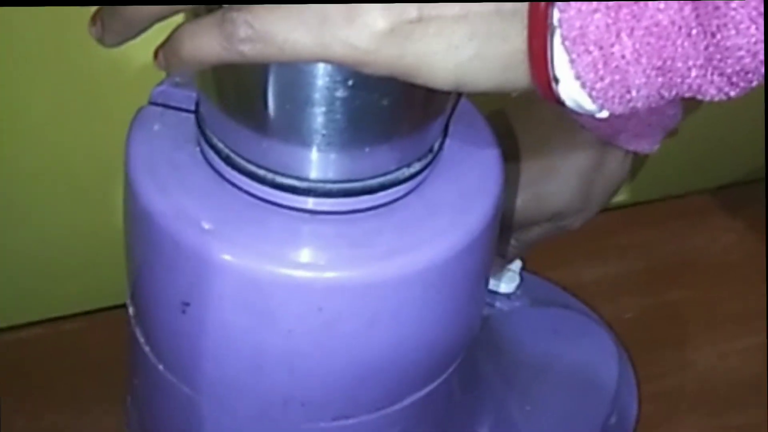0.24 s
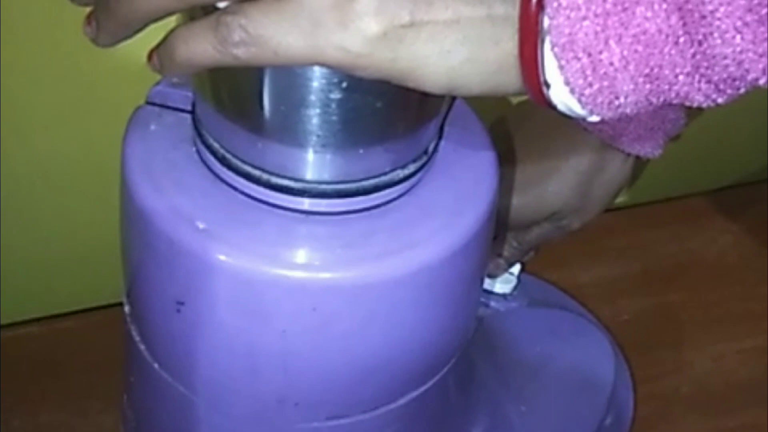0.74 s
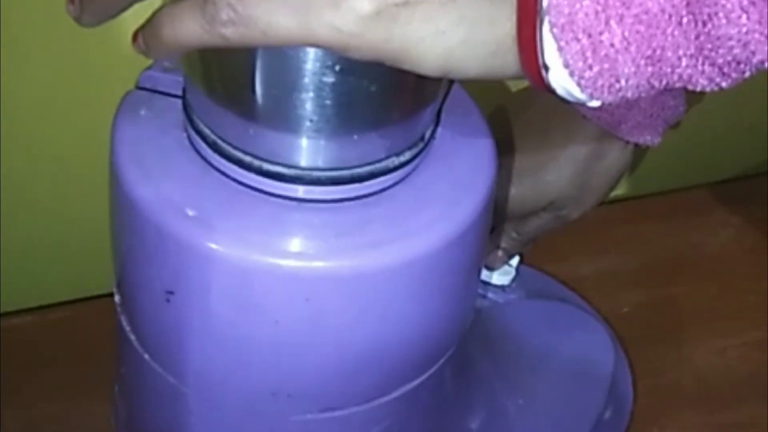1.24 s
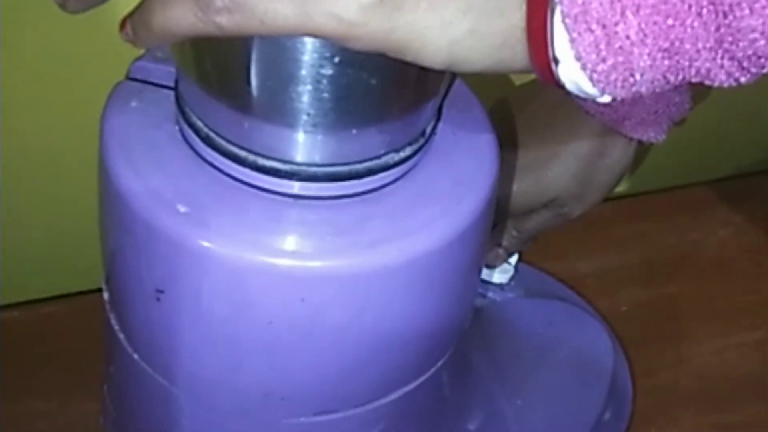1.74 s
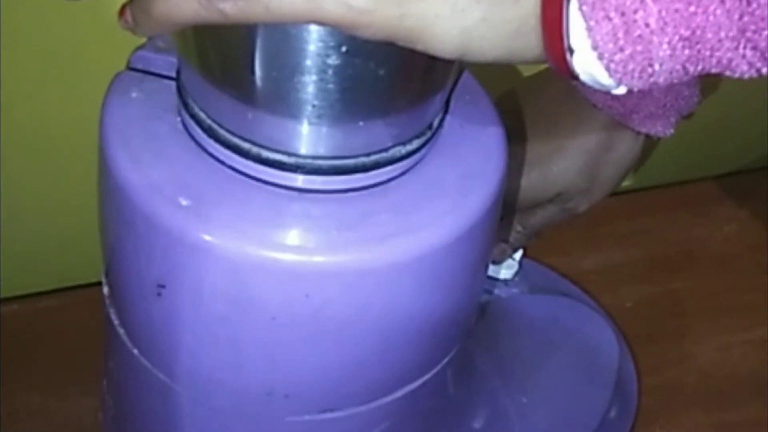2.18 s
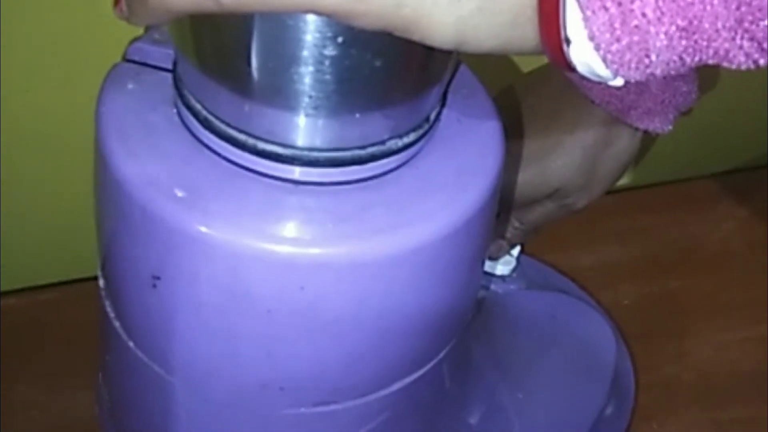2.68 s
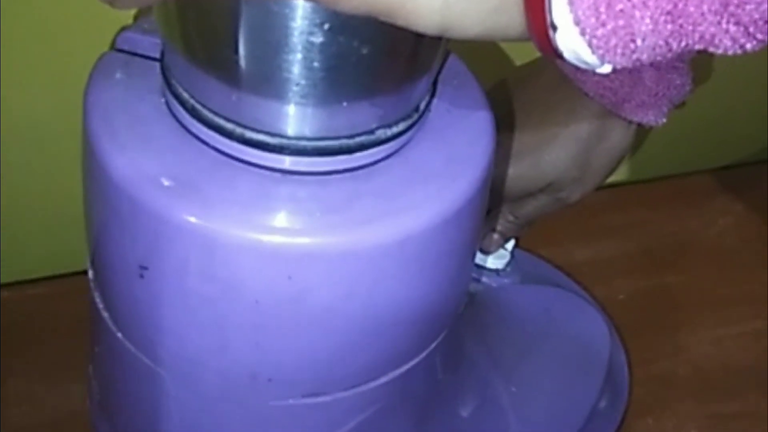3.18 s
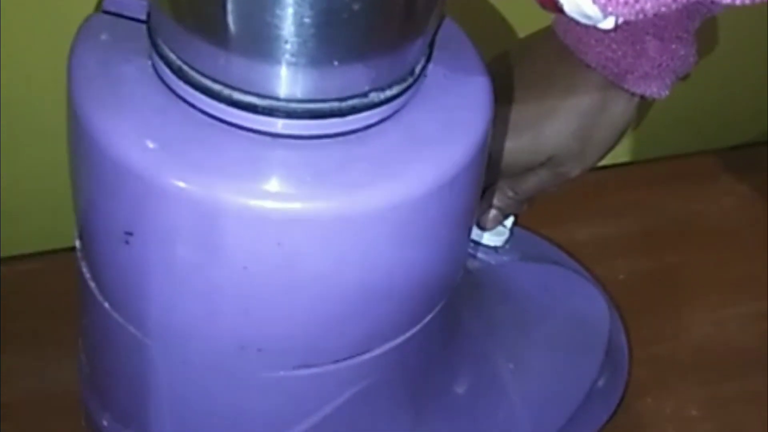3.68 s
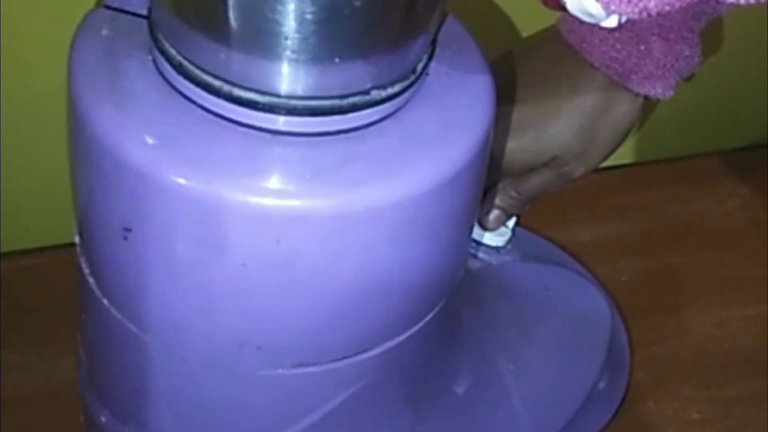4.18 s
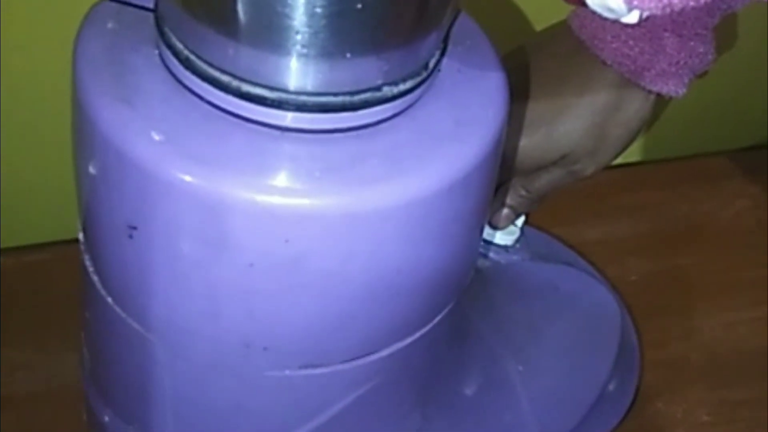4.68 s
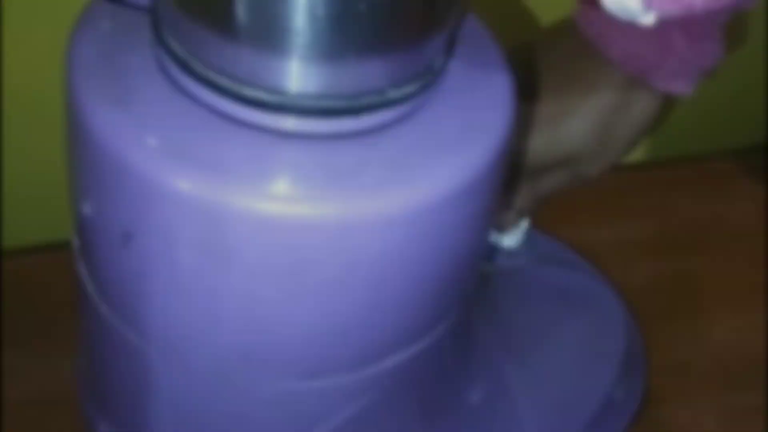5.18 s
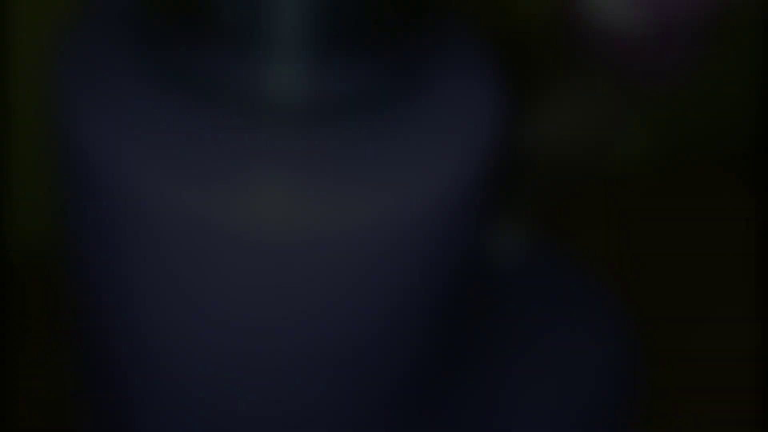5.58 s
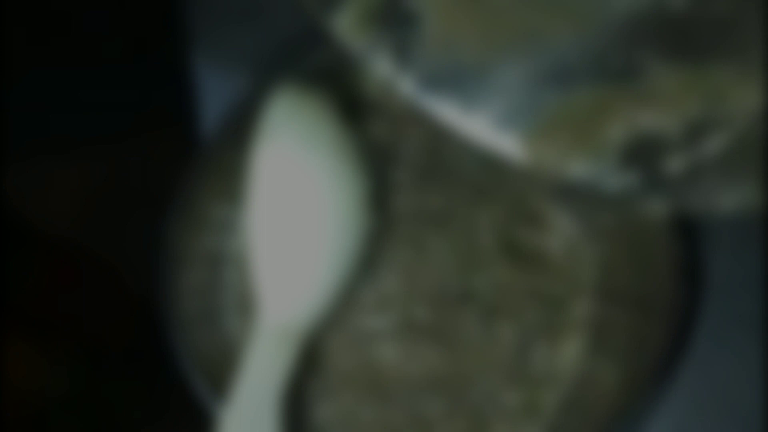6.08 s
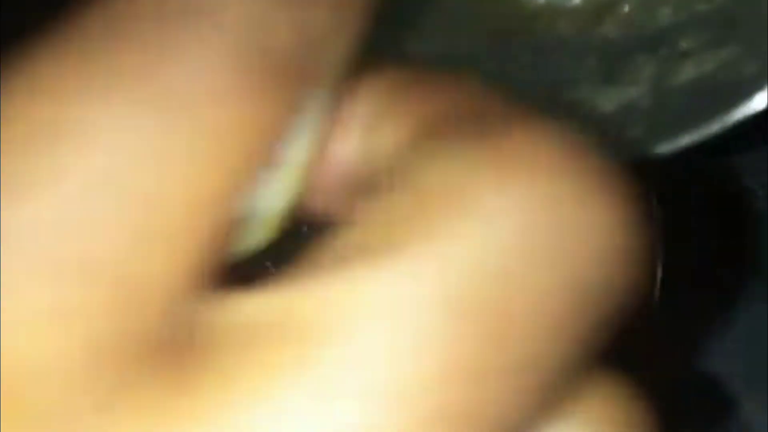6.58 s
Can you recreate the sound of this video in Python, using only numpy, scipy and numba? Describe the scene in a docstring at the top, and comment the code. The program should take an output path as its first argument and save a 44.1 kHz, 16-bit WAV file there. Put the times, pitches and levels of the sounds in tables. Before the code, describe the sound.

An electric mixer grinder clicks on, whirs loudly through paste, then cuts off abruptly; a spoon faintly scrapes and taps a steel jar.

```python
"""In a kitchen, a mixer grinder clicks on, spins up and whirs. Shaft unbalance, blades and commutator
sound harmonics of the rotation over mains hum; churning paste excites the resonances of the steel jar,
and turbulent cooling air hisses. The whir is cut off abruptly. The quiet room, heard briefly at the
start, fades in again with a far engine throbbing, and a spoon scrapes and taps a steel jar,
setting its modes ringing."""
import sys
import numpy as np
from scipy import signal
from scipy.fft import rfft, irfft, next_fast_len
from scipy.io import wavfile
from scipy.ndimage import uniform_filter1d
from numba import njit

SR = 44100
rng = np.random.default_rng(int(sys.argv[2]) if len(sys.argv) > 2 else 0)


def output_pcm(signal):
    """Save a mono or channel-first signal as 16-bit PCM at the path in sys.argv[1].

    Samples are clipped to [-1, 1] before scaling.
    """
    pcm = np.clip(np.atleast_2d(signal).T, -1, 1) * 32767
    wavfile.write(sys.argv[1], SR, np.round(pcm).astype(np.int16))


N = 301203
T = np.arange(N) / SR
PAN = np.array([[.5], [-.5]])  # splits a pan, the left minus right level, between the channels

# Stereo field: (frequency [Hz], pan [dB]), (frequency [Hz], coherence [0-1]), (frequency [Hz], lag [rad])
BALANCE = [(60, 1), (200, -2.5), (700, 2.5), (1300, 1), (2400, 3.5), (4400, -1), (6000, 0), (8200, 11),
           (10500, 10), (12500, 4.5), (13500, 10.5), (15400, -6.5)]
COHERENCE = [(30, .3), (60, .9), (100, .94), (200, .97), (400, .91), (700, .87), (1400, .62), (2800, .52),
             (5000, .2), (15000, .02)]
LEFT_LAG = [(100, 0.11), (300, 0.21), (700, 0.52), (1400, 1.84), (2800, 7.57), (5000, 10.1)]
# Noise spectra: (frequency [Hz], relative spectral density [dB])
ROOM_SPECTRUM = [(30, -12), (60, 7), (100, 4.5), (180, -2), (290, -13), (450, -9.5), (1000, -9.5),
                 (2200, -13), (3800, -20.5), (7000, -32), (11000, -31), (15400, -22.5)]
SWITCH_SPECTRUM = [(300, -18), (1200, -11), (2000, -5), (3100, 2), (4500, -12), (7000, -30), (12500, -13.5),
                   (15400, -38)]
CHURN_SPECTRUM = [(24, -79.5), (40, -49), (87, -23.5), (182, -15), (240, -9), (286, -10.5), (395, -14.5),
                  (708, -12.5), (1050, -14), (1610, -14), (2760, -15), (3430, -20.5), (3910, -23),
                  (6150, -33.5), (7000, -41), (9100, -95.5), (15400, -120)]
AIR_SPECTRUM = [(3200, -30), (5500, -11), (6700, -13.5), (8000, -10), (9600, -6), (10600, -1),
                (11100, -1.5), (11600, 1.5), (12100, -2), (12800, -3), (14500, -1), (15500, 1)]
SCRAPE_SPECTRUM = [(400, -20), (1000, -9), (2300, 4), (3500, 4), (5000, -16), (7500, -15), (12000, -9),
                   (15400, -7)]
# Quiet stretches: (start [s], fade-in [s], room level [dB], engine level [dB])
QUIET_STRETCHES = [(.09, 0.09, -59.5, -59), (5.79, 0.18, -62.5, -61)]
# One crest of the engine's throb in each stretch: (time [s])
THROB_CRESTS = [0.14, 6.481]
# Cracks of the switch knob: (time [s], level [dB], decay time [s])
SWITCH_CRACKS = [(.358, -27, 0.012), (.365, -12.5, 0.0047), (0.37, -25, 0.0045)]
# Shaft speed under the changing load: (time [s], rotation rate [Hz])
LOADED_SPEED = [(1.2, 243), (1.45, 241.3), (1.93, 242), (2.05, 240.2), (3.03, 240.6), (3.16, 238.6),
                (3.3, 238.2), (3.8, 240.4), (4.98, 240), (5.2, 241.6), (5.48, 242.8), (5.74, 242.6)]
# Brief dips of the unbalance tone: (time [s], depth [dB], half width [s])
UNBALANCE_DIPS = [(.49, -1, .04), (0.535, 0, 0.018), (.665, 11, 0.039), (.745, 15, 0.014), (1.18, 5, .015),
                  (1.64, 8, 0.046), (1.89, 3, 0.062), (4.05, 1, .015), (5.15, 3, 0.05), (5.38, 4, 0.043),
                  (5.48, 4, 0.021)]
# Partials, multiples rounded in use: (shaft multiple, ripple multiple, relative level [dB], pan [dB])
BEAT_PARTIALS = [(0.98, -0.84, -25, -1.2)]  # hum beating with the unbalance tone
BLADE_PARTIALS = [(2, 0, -2.5, 1.5), (2, 1, -4.5, -3), (3, 1, -6.5, -2.5), (6, 0, -5, 8.5), (8, 0, -9.5, 6),
                  (10, 0, -6, -2.5)]
SINGING_PARTIALS = [(3, 0, -35, -1), (4, 0, -43, -2)]  # blade tones that grow as the paste turns smooth
WHINE_PARTIALS = [(16, 0, -13, -7), (36, 0, -27, 11), (48, 0, -25, 16), (64, 0, -22, 0)]
SLOT_PARTIALS = [(12, 0, -27, 0), (24, 0, -34, 0)]
HUM_PARTIALS = [(0, 1.1, -41, -1.1), (0, 2.2, -37.5, -1)]
# Transmission through the motor shell: (frequency [Hz], gain [dB])
SHELL_RESPONSE = [(1000, -5), (1800, -10), (2150, 6), (2600, 5), (3300, 2), (3900, 8), (4300, -5),
                  (4750, -3), (5050, 5), (5300, 0), (5600, -10)]
# Jar and housing resonances and dips:
# (frequency [Hz], width [Hz], left gain [dB], right gain [dB], change with smooth paste [dB])
BODY_MODES = [(308.7, 50, 1.5, 5.5, -6), (413, 30, -4.5, 2.5, -2.5), (508, 41, -3.5, -7.5, 1),
              (630, 15, 7.5, 1, -2), (700, 35, -8.5, 3.5, 6.5), (850, 35, 5, 1, -2.5),
              (905, 31, -5.5, -6.5, 0.5), (940, 23, 1.5, 4, 2), (963, 93, 0, 6.5, 3.5),
              (1039.6, 15, 7, 9, -2), (1061, 24, 12.5, 8, -6.5), (1236, 16, 3, 6, -3),
              (1269, 16, 6.5, 12, -15.5), (1394, 61, -7.5, 4, 0.5), (1457, 20, 7, -3.5, 5),
              (1730, 310, 2, 1.5, 4), (2040, 94, -1.5, -5.5, -2), (2345, 120, -3.5, -4, 2.5),
              (2472, 100, -3.5, -2, -0.5), (2627, 33, 7, 5, -7.5), (2753, 62, 5, 11, -8.5),
              (3150, 120, 3.5, 4, -5.5), (3490, 150, -3.5, -1, 3), (3570, 60, 5, 2, 1.5),
              (3837, 180, 4.5, 6.5, 3.5), (4260, 110, 3, 7.5, 1.5), (4610, 120, 1.5, 3.5, 1),
              (5830, 200, 6, 3.5, 5), (6150, 300, -15, -14, -2.5), (6240, 110, 6.5, 6, 0.5)]
# Jar wall under the paste: (frequency [Hz], nominal width [Hz], level [dB])
WALL_MODES = [(946.5, 76, -3), (1211, 120, -2), (2063, 110, -3), (2755, 110, 0), (3174, 150, -8.5),
              (3832, 160, -10), (5160, 300, -20)]
# Chunks hitting the blades: (time [s], churn lift [dB], hiss lift [dB])
SPURTS = [(.51, 4.5, -1.5), (.66, 3, 6), (.71, 2.5, 2.5), (.88, 2, -0.5), (.95, 3, 3), (1.014, 2, 3),
          (1.27, 2, 1), (1.98, 1.5, 0), (2.3, 2, 3), (5.34, 1.5, 0.5)]
# Jar struck by the spoon: (frequency [Hz], level [dB], 60 dB decay time [s])
JAR_MODES = [(480, -4, .02), (760, -11, .025), (954, 6, 0.025), (1077, 4, 0.03), (1816, 1.5, .025),
             (2140, -2.5, 0.094), (2400, -1, .045), (2680, -13, 0.063), (3030, -6, .015), (3380, 12, 0.018),
             (3530, 4, .03), (4330, -13, .025), (5300, -12, .02), (7240, -17.5, .04), (12000, -20, .02)]
# Spoon contacts:
# (time [s], peak [dB], favoured frequency [Hz], spread [octaves], duration [s], pan [dB], scrape [dB])
SPOON_CONTACTS = [(5.915, -58, 2390, .1, 0.031, 6, -75), (6.014, -66, 2500, .4, 0.048, 3, -59),
                  (6.08, -64, 2000, .3, .02, 6, -73), (6.45, -61, 2000, 0.21, 0.019, 9, -76),
                  (6.571, -61, 2700, .08, .012, 10, -78), (6.622, -52, 1000, .3, .008, -8, -66),
                  (6.636, -54, 1000, .3, .012, -8, -69), (6.645, -54, 2600, .18, .015, 10, -72),
                  (6.662, -39, 1000, 0.56, 0.003, -23, -46), (6.668, -31, 2300, .9, 0.003, 13.5, -35),
                  (6.692, -59, 2110, .12, .03, 2, -61), (6.716, -54, 2700, .1, .016, 9, -64),
                  (6.748, -45, 2170, .15, 0.022, 4, -66), (6.75, -59, 3400, .08, .025, 6, -72),
                  (6.778, -43, 2150, .18, .0094, 8, -65), (6.79, -39, 1800, 0.46, 0.0028, -10, -58),
                  (6.812, -40, 1400, 0.49, 0.01, -13, -58), (6.824, -29.5, 1060, 0.89, 0.0018, -12, -55)]

ON_S, CUT_S = .372, 5.744
FULL_SPEED_HZ, RIPPLE_HZ = 241, 99.2  # shaft rotation; torque ripple from the mains
COARSE_S, SMOOTH_S = .95, 5.93  # the paste turns smooth between these times


def undb(db):
    """Amplitude ratio of a level in decibels."""
    return np.exp(np.asarray(db) * np.log(10) / 20)


def unit(x):
    """Normalisation to an rms of 1."""
    return x / np.sqrt(np.mean(x ** 2))


def read(table, hz):
    """Interpolation on a logarithmic frequency axis."""
    freqs, values = np.transpose(table)
    return np.interp(np.log(np.maximum(hz, 1)), np.log(freqs), values)


def bump(at_s, width_s):
    """Gaussian pulse of height 1."""
    return np.exp(-((T - at_s) / width_s) ** 2)


def resonance(hz, centre, width):
    """Lorentzian resonance curve of height 1."""
    return 1 / (1 + (2 * (hz - centre) / width) ** 2)


@njit
def bandpass(x, hz, width):
    """Second-order resonator in state-variable form, with gain 1 at the centre."""
    y, band, low = np.empty(len(x)), 0., 0.
    g, damping = np.tan(np.pi * hz / SR), width / hz
    for i in range(len(x)):
        v = (band + g * (x[i] - low)) / (1 + g * (g + damping))
        band, low, y[i] = 2 * v - band, low + 2 * g * v, damping * v
    return y


def walk(rate):
    """Smooth random modulation: about `rate` values a second, with a spread near 1."""
    hold = int(400 / rate) + 1
    steps = np.repeat(rng.standard_normal(3000 // hold + 1), hold)
    slow = uniform_filter1d(uniform_filter1d(steps, hold), hold)
    return 1.3 * np.interp(T, np.arange(len(slow)) / 400, slow)


def colour(noises, spectrum, modes=()):
    """Partial coherence: three noises (shared, left, right) mix to a filtered stereo pair of rms 1."""
    size = next_fast_len(N)
    hz = np.arange(size // 2 + 1) * SR / size
    shared, left, right = rfft(noises, size)
    coherence = read(COHERENCE, hz)
    common, apart = np.sqrt(coherence) * shared, np.sqrt(1 - coherence)
    pair = np.array([common * np.exp(-1j * read(LEFT_LAG, hz)) + apart * left, common + apart * right])
    db = read(spectrum, hz) + PAN * read(BALANCE, hz)
    for centre, width, *lift_db in modes:
        db = db + np.array(lift_db)[:, None] * resonance(hz, centre, width)
    return unit(irfft(pair * undb(db), size)[:, :N])


def restless(lowest_hz, count, swell_db, flicker_db, rate):
    """Amplitude modulation of three noises: octave bands swell together and flicker independently."""
    out, swell = 0, walk(6.6)
    for hz in lowest_hz * 2. ** np.arange(count):
        gain = undb(swell_db * swell + flicker_db * walk(rate))
        out = out + gain * np.array([bandpass(rng.standard_normal(N), hz, hz) for _ in range(3)])
    return out


def tones(turn, partials, waver_db, blur_rad, rate):
    """Combination tones of shaft angle and torque ripple, each wavering in level and phase."""
    out = 0
    for order, ripple, db, pan_db in partials:
        phase = round(order) * turn + round(ripple) * 2 * np.pi * RIPPLE_HZ * T + blur_rad * walk(rate)
        lag = PAN * read(LEFT_LAG, order * FULL_SPEED_HZ + ripple * RIPPLE_HZ)
        out = out + np.sqrt(2) * undb(db + waver_db * walk(rate) + PAN * pan_db) * np.sin(phase - lag)
    return out


def far_engine(crest_s, firing_hz=16.25):
    """Amplitude modulation: each firing pulses the exhaust rasp and a low harmonic that swells once."""
    cycle = 2 * np.pi * firing_hz * (T - crest_s)
    harmonic = undb(13 * bump(THROB_CRESTS[-1], .067)) * np.sin(6 * cycle + .5 * walk(15))
    rasp = undb(-12) * unit(bandpass(rng.standard_normal(N), hz=270, width=100))
    return (1 + np.cos(cycle)) * (harmonic + rasp)


def kitchen():
    """Superposition: room noise and the far engine fade in before the mixer runs and again after it."""
    room = colour(rng.standard_normal((3, N)) * undb(1.4 * walk(13)), ROOM_SPECTRUM)
    out = 0
    for stretch, crest_s, db_per_s, end_s in zip(QUIET_STRETCHES, THROB_CRESTS, (54, 3.5), (ON_S, T[-1])):
        start_s, fade_s, room_db, engine_db = stretch
        fade = undb(-29 * np.clip(1 - (T - start_s) / fade_s, 0, 1) ** 2) * (T >= start_s) * (T <= end_s)
        creep_db = db_per_s * np.clip(T - start_s - .16, -1, 1)
        out = out + fade * (undb(room_db + creep_db) * room + undb(engine_db) * far_engine(crest_s))
    return out


def switch():
    """Impulsive excitation: the plastic knob snaps over in quick, exponentially decaying cracks."""
    envelope = sum(undb(db) * np.clip((T - s) / .0025, 0, 1) * np.exp(-np.maximum(T - s, 0) / decay_s)
                   for s, db, decay_s in SWITCH_CRACKS)
    return envelope * colour(rng.standard_normal((3, N)), SWITCH_SPECTRUM)


def unbalance(turn, hz, shortfall, octaves, smooth):
    """Forced vibration: the unbalanced shaft shakes the housing, passing its resonance on the way up."""
    drive_db = -19 + 14.5 * octaves - 3 * smooth ** 2  # smooth paste eases the unbalance
    housing_db = 8.5 * resonance(hz, centre=205, width=23)
    judder_db = 14 * shortfall * (walk(45) - 1) + .9 * walk(9)  # the slow shaft judders most
    dip_db = sum(db * bump(s, width_s) for s, db, width_s in UNBALANCE_DIPS)
    fundamental = tones(turn, [(1, 0, 0, -1.5)], waver_db=.7, blur_rad=.066, rate=12)
    beat = tones(turn, BEAT_PARTIALS, waver_db=1.9, blur_rad=.57, rate=22)
    return undb(drive_db + housing_db + judder_db - dip_db) * (fundamental + beat)


def blades(turn, octaves, smooth):
    """Periodic forcing: the blades sound shaft harmonics, two of which grow as the paste turns smooth."""
    whir = undb(-32 + 10 * octaves) * tones(turn, BLADE_PARTIALS, waver_db=3.1, blur_rad=.37, rate=25)
    singing_db = 14.5 * octaves + 6.5 * smooth + 2.5 * np.maximum(T - 4.36, 0)  # harder near the end
    return whir + undb(singing_db) * tones(turn, SINGING_PARTIALS, waver_db=3.25, blur_rad=.19, rate=28)


def whine(turn, smooth):
    """Passing frequencies: fan vanes and commutator bars sound high multiples of the rotation."""
    return undb(-2 + 7 * smooth) * tones(turn, WHINE_PARTIALS, waver_db=4, blur_rad=3, rate=180)


def armature_slots(turn, hz, slip):
    """Magnetic forcing: slot tones pass through the shell, stronger as a slow rotor draws more current."""
    slots = sum(undb(read(SHELL_RESPONSE, row[0] * hz))
                * tones(turn, [row], waver_db=4, blur_rad=1.6, rate=150) for row in SLOT_PARTIALS)
    return undb(75 * np.minimum(slip, .25)) * slots


def mains_hum(turn, slip):
    """Magnetic hum: the field pulses at the ripple rate and its octave, hardest during the inrush."""
    return sum(undb(db_per_slip * np.clip(slip - threshold, 0, .4))
               * tones(turn, [row], waver_db=3.3, blur_rad=.78, rate=30)
               for row, db_per_slip, threshold in zip(HUM_PARTIALS, (24.5, 36), (.041, .29)))


def churning(turn, smooth):
    """Source and filter: thrown paste excites jar resonances whose weights shift as lumps break down."""
    lumps = undb(1.15 * walk(120)) * (1 + .051 * np.cos(turn))  # blade strikes, swept once a turn
    noise = restless(50, count=8, swell_db=.2, flicker_db=.8, rate=20) * lumps
    coarse_modes = [row[:4] for row in BODY_MODES]
    fine_modes = [(hz, width, left + db, right + db) for hz, width, left, right, db in BODY_MODES]
    coarse, fine = colour(noise, CHURN_SPECTRUM, coarse_modes), colour(noise, CHURN_SPECTRUM, fine_modes)
    return (1 - smooth) * coarse + smooth * fine


def rattle(slip, hits_per_s=1100):
    """Poisson impacts: hard bits ring the modes of the jar wall, each from its own side."""
    chance, strength, place = rng.random((3, N))
    hits = (chance < hits_per_s / SR) * undb(np.minimum(-3 * np.log(1 - strength), 9))
    pings = [sum(undb(db) * bandpass(bandpass(hits * side, hz, 2 * width), hz, width) / np.sqrt(width)
                 for hz, width, db in WALL_MODES)
             for side in (np.cos(np.pi / 2 * place), np.sin(np.pi / 2 * place))]
    # whole pieces rattle harder while the blades gather speed, but very slow blades throw little
    level_db = -7 + 22.5 * np.minimum(slip, .2) - 60 * np.maximum(slip - .22, 0)
    return undb(level_db) * unit(np.array(pings))


def cooling_air(turn, smooth):
    """Turbulent noise, modulated by ripple and rotation; it thickens by 1 dB as the load eases."""
    pulsing = 1 + .06 * np.cos(2 * np.pi * RIPPLE_HZ * T) + .04 * np.cos(turn)
    noise = restless(4000, count=3, swell_db=.6, flicker_db=1.1, rate=12)
    return undb(smooth ** 2) * colour(noise * pulsing, AIR_SPECTRUM)


def lid_buzz(at_s=.71, hz=5120, width=260):
    """Sympathetic vibration: the lid buzzes in a narrow noise band at one moment of the spin-up."""
    buzz = np.array([bandpass(bandpass(rng.standard_normal(N), hz, width), hz, width) for _ in PAN])
    return undb(-37 + 2 * walk(60)) * bump(at_s, .1) * unit(buzz)


def mixer(quick_s=.11, slow_s=.25):
    """Exponential approach: the shaft spins up with two time constants; speed sets pitch and level."""
    elapsed = np.maximum(T - .35, .01)
    shortfall = .68 * np.exp(-elapsed / quick_s) + .32 * np.exp(-elapsed / slow_s)
    hz = np.interp(T, *np.transpose(LOADED_SPEED)) * (1 - shortfall)
    octaves = np.log2(1 - shortfall)  # relative to the loaded speed
    slip = np.clip(1 - hz / FULL_SPEED_HZ, 0, 1)
    turn = 2 * np.pi * np.cumsum(hz + .4 * walk(14)) / SR  # shaft angle [rad]
    smooth = np.clip((T - COARSE_S) / (SMOOTH_S - COARSE_S), 0, 1) ** .99
    churn_db = np.maximum(-16.5 + 15 * octaves, -27) + sum(db * bump(s, .023) for s, db, _ in SPURTS)
    hiss_db = np.maximum(-26 + 10.5 * octaves, -37.5) + sum(db * bump(s, .023) for s, _, db in SPURTS)
    shaft = unbalance(turn, hz, shortfall, octaves, smooth) + blades(turn, octaves, smooth)
    motor = undb(hiss_db) * whine(turn, smooth) + undb(churn_db) * armature_slots(turn, hz, slip)
    hum = mains_hum(turn, slip)
    paste = undb(churn_db + 1.9 * smooth ** 2) * (churning(turn, smooth) + rattle(slip))
    air = undb(hiss_db) * cooling_air(turn, smooth)
    onset = np.clip((T - ON_S) / .0077, 0, 1)
    cut = np.where(T < CUT_S, 1, undb(-19 - 1420 * np.maximum(T - CUT_S, 0)))  # a short, faint tail
    return (shaft + motor + hum + paste + air + lid_buzz()) * onset * cut


def spoon(build_s=.0012):
    """Modal response: each rough push rings the jar modes near a favoured pitch and adds a scrape."""
    taps, scrape = np.zeros((2, 2, N))
    t = np.arange(SR // 4) / SR
    onset = 1 - np.exp(-(t / build_s) ** 2)  # soft contact lets the ring build up
    for at_s, peak_db, favoured_hz, spread, contact_s, pan_db, scrape_db in SPOON_CONTACTS:
        ring = sum(undb(db - 5.2 * (np.log2(hz / favoured_hz) / spread) ** 2 - 60 * t / t60)
                   * np.sin(2 * np.pi * hz * t) for hz, db, t60 in JAR_MODES)
        pressure = np.sin(np.pi * np.clip(t / contact_s, 0, 1))
        push = rng.standard_normal(SR // 20) * pressure[:SR // 20]
        hit = signal.fftconvolve(ring * onset, push)
        hit /= np.abs(hit).max()
        i = int(at_s * SR)
        taps[:, i:i + len(hit)] += undb(peak_db + PAN * pan_db) * hit[:N - i]
        room_tail = .51 * np.minimum(t / contact_s, 1) * np.exp(-t / .013)
        scrape[:, i:i + len(t)] += undb(scrape_db + PAN * pan_db) * (pressure + room_tail)[:N - i]
    return taps + scrape * colour(rng.standard_normal((3, N)), SCRAPE_SPECTRUM)


def scene():
    """Linear superposition of kitchen, switch, mixer and spoon."""
    return kitchen() + switch() + mixer() + spoon()


def record(dry, top_hz=15480):
    """Soft saturation rounds the loudest peaks, and a steep low-pass limits the bandwidth."""
    lowpass = signal.ellip(12, .3, 80, top_hz, fs=SR, output="sos")
    return signal.sosfilt(lowpass, np.tanh(.9 * dry) / .9)


dry = scene()
out = record(dry)
output_pcm(out)
```